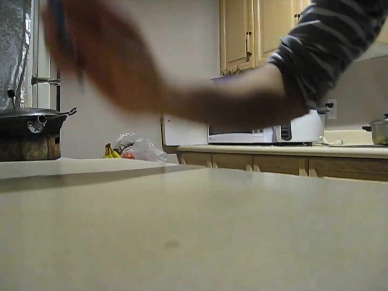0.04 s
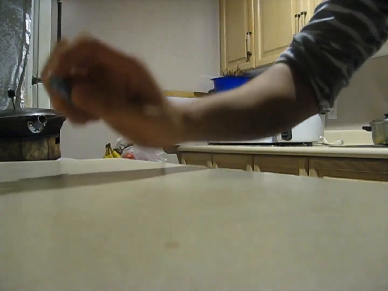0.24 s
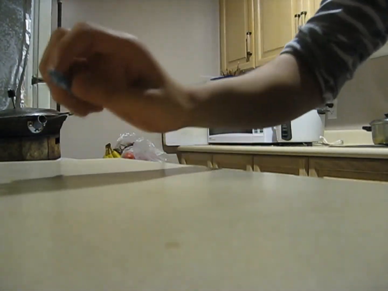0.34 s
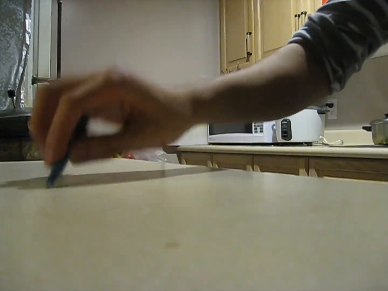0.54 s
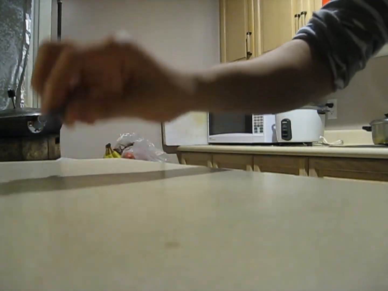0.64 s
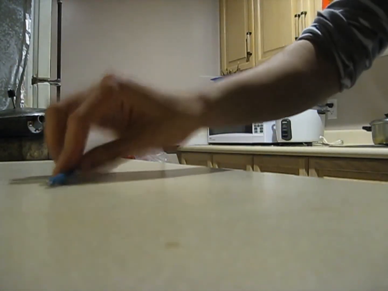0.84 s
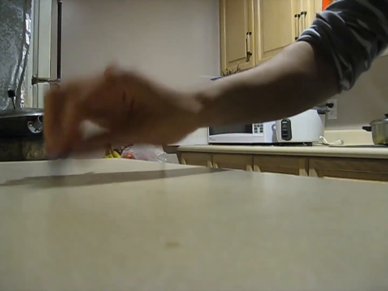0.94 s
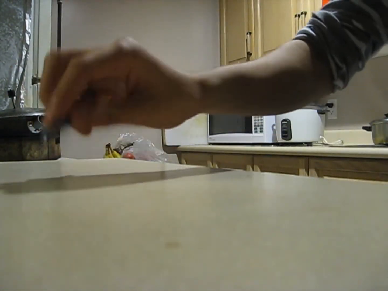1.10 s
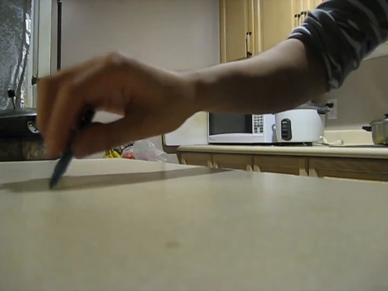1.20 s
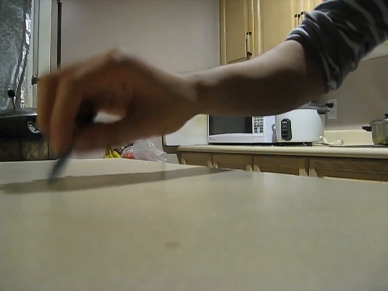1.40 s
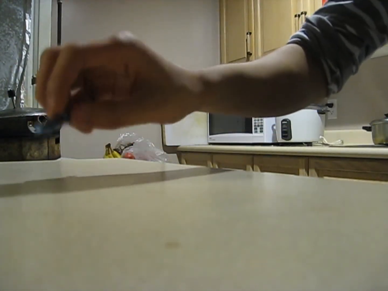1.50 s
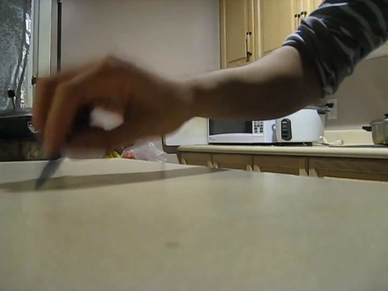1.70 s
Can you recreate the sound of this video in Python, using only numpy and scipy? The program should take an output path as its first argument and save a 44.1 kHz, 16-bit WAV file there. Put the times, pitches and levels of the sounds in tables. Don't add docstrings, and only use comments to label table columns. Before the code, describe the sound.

Hard pen taps on a countertop, one with a clattering slap, over faint appliance hum

```python
import sys
import numpy as np
from scipy import signal
from scipy.fft import rfft, irfft
from scipy.io import wavfile
from scipy.ndimage import uniform_filter1d

SR = 44100
rng = np.random.default_rng(int(sys.argv[2]) if len(sys.argv) > 2 else 0)


def output_pcm(signal):
    pcm = np.clip(np.atleast_2d(signal).T, -1, 1) * 32767
    wavfile.write(sys.argv[1], SR, np.round(pcm).astype(np.int16))


def gain_from_db(level_db):
    decades = np.asarray(level_db, float) / 20
    return 10 ** decades


N = 77175


def rms_one(x):
    return x / np.sqrt(np.mean(x ** 2) + 1e-20)


def at_hz(points, hz, column=1):
    points = np.array(points)
    return np.interp(np.log(hz), np.log(points[:, 0]), points[:, column])


def low_pass(x, hz, order=2):
    return signal.sosfilt(signal.butter(order, hz, fs=SR, output="sos"), x)


def high_pass(x, hz, order):
    return signal.sosfilt(signal.butter(order, hz, "high", fs=SR, output="sos"), x)


def band_pass(x, low_hz, high_hz, order):
    return signal.sosfilt(signal.butter(order, [low_hz, high_hz], "band", fs=SR, output="sos"), x)


def strike(modes, times_s, db, sign=1, alternate=-1):
    spread_db = 2
    at = (np.asarray(times_s) * SR).astype(int)
    spread = spread_db * rng.standard_normal((len(at), len(modes)))
    out = np.zeros(N)
    for k, (hz, level_db, t60) in enumerate(modes):
        clicks = np.full(N, 1e-18)
        np.add.at(clicks, at, sign * alternate ** k * gain_from_db(db + level_db + spread[:, k]))
        r = gain_from_db(-60 / (max(t60, .001) * SR))
        w = 2 * np.pi * hz / SR
        out += signal.lfilter([0, np.sin(w)], [1, -2 * r * np.cos(w), r * r], clicks)
    return out


def crack(spectrum, times_s, db, room_db):
    t60_s = 0.0084
    fade = gain_from_db(-60 * np.arange(512) / SR / t60_s)
    at = (np.asarray(times_s) * SR).astype(int)
    bursts = np.full((2, N + 512), 1e-18)
    noises = rng.standard_normal((len(at), len(fade)))
    for i, gain, noise in zip(at, gain_from_db(db), noises):
        bursts[0, i:i + len(fade)] += gain * noise * fade
    bursts[1, at] = 4 * gain_from_db(db + room_db)
    edges = 150 * 2 ** np.arange(0, 7.1, .5)
    out = 0
    for low, high in zip(edges, edges[1:]):
        gain = gain_from_db(at_hz(spectrum, np.sqrt(low * high)) + 12)
        out = out + gain * band_pass(bursts[:, :N], low, high, order=1)
    return out


def hum():
    # [f/Hz, level/dB per Hz]
    noise_colour = [(15, -35), (25, -15), (249, -9.5), (427, -13.5), (677, -6.5), (734, -21), (887, -6),
                    (1290, -15.5), (16000, -33.5)]
    # [f/Hz, width/Hz, level/dB]
    fridge_bands = [(47, 12, -66), (108, 120, -61.5), (702.3, 24, -52), (930, 89, -73), (1193, 69, -59),
                    (580, 44, -61), (8000, 250, -67)]
    broad_db = -36.5 - 8.0
    hz = np.maximum(np.fft.rfftfreq(N, 1 / SR), 1)
    broad = irfft(rfft(rng.standard_normal(N)) * gain_from_db(at_hz(noise_colour, hz)), N)
    out = gain_from_db(broad_db) * rms_one(broad)
    for centre_hz, width_hz, db in fridge_bands:
        resonance = 1 / (1 + (2 * (hz - centre_hz) / width_hz) ** 2)
        out = out + gain_from_db(db) * rms_one(irfft(rfft(rng.standard_normal(N)) * resonance, N))
    return out


def kitchen(x):
    # [f/Hz, level/dB, t60/s]
    room_bands = [(152, -0.5, 0.37), (387, -4.5, 0.29), (1080, -3, 0.33), (2100, -6.5, 0.33),
                  (4300, -12.5, 0.35), (8400, -15.5, 0.27), (15600, -3.5, 0.18)]
    start_s, build_s = 0.0013, 0.0065
    t = np.arange(SR) / SR
    edges = 60 * 2 ** np.arange(0, 8.3, .5)
    white = rng.standard_normal((2, SR))
    tail = 0
    for k, (low, high) in enumerate(zip(edges, edges[1:])):
        hz = np.sqrt(low * high)
        decay_db = at_hz(room_bands, hz) - 60 * t / at_hz(room_bands, hz, column=2)
        tail = tail + band_pass(white[k % 2], low, high, order=2) * gain_from_db(decay_db)
    tail = tail * np.clip((t - start_s) / build_s, 0, 1) / np.sqrt(SR / 40)
    return signal.fftconvolve(x, tail)[:N]


def hand():
    push_s = [
        .2038,
        .2072,
    ]
    push_db = [
        -0.5,
        0,
    ]
    knock_s = [
        .2049,
        .2190,
        .2472,
    ]
    knock_db = [
        0.61,
        -16.5,
        -14.5,
    ]
    # [f/Hz, level/dB, t60/s]
    board_modes = [(86, -9, .07), (113.8, -2, 0.087), (111.3, -20, 0.65), (148.1, -3, 0.2)]
    # [f/Hz, level/dB, t60/s]
    knock_modes = [(770, -26, .015), (1074, 0.5, 0.025), (1560, -3, 0.0064), (2113, 3.5, 0.0083),
                   (2900, -39, 0.0057), (5530, -35, 0.0069)]
    # [f/Hz, level/dB, t60/s]
    cupboard_modes = [(151, -4.5, 0.11), (220, -11, 0.082), (251.4, -11, 0.11), (290, -6, 0.085),
                      (347.3, -11, 0.11), (493, -7.5, 0.041), (650, -22, 0.072), (804, -14.5, 0.043),
                      (1060, -3.5, .03), (5320, -24, 0.065), (5450, -24, 0.035)]
    # [f/Hz, level/dB per Hz]
    hand_crack = [(200, -10.5), (600, 7), (1200, -11.5), (2200, -8.5), (4000, -11.5), (7000, 2),
                  (11000, -32), (16000, -38)]
    rattle_from_s, rattle_to_s, rattle_start_db, rattle_loss_db = .207, .27, -15, 10
    cupboard_db, room_db, skin_soft_hz = 0.5, 2, 3450
    damped_s, damp_s = 0.37, 0.0073

    share = np.sort(rng.random(24))
    rattle_s = rattle_from_s + share * (rattle_to_s - rattle_from_s)
    rattle_db = rattle_start_db - rattle_loss_db * share
    board = strike(board_modes, push_s, np.array(push_db), np.array([-1, 1]), alternate=0.63)
    board = board * np.exp(-np.maximum(np.arange(N) / SR - damped_s, 0) / damp_s)
    either_way = rng.choice([-1, 1], len(rattle_s))
    loose = strike(cupboard_modes, rattle_s, rattle_db + cupboard_db, either_way)
    knock = low_pass(strike(knock_modes, knock_s, np.array(knock_db)), skin_soft_hz)

    hit_s = np.r_[knock_s, rattle_s]
    hit_db = np.r_[knock_db, rattle_db]
    to_room_db = np.where(np.arange(len(hit_s)) == 0, room_db, -40)
    cracks = low_pass(crack(hand_crack, hit_s, hit_db, to_room_db), skin_soft_hz)
    return np.vstack([board + loose + knock, cracks])


def pen():
    # [strength/dB, brightness/dB, board/dB]
    tap_s = [
        .5737,
        .9252,
        1.2668,
        1.4472,
    ]
    tap_levels = [
        (0, 1, 1.5),
        (3.5, 1.5, 0),
        (-4.5, 0, -16),
        (-1, -0.5, 2.5),
    ]
    slap_s = [
        .9351,
        .9386,
        .9397,
        .9414,
        .9429,
        .9445,
        .9476,
    ]
    slap_levels = [
        -7.5,
        11,
        8.5,
        2.5,
        7,
        4.5,
        2,
    ]
    # [f/Hz, level/dB, t60/s]
    barrel_modes = [(498, -25.5, 0.089), (1050, -9.5, 0.034), (1193, -11, 0.023), (1816, -10.5, 0.037),
                    (2117, -4.5, 0.018), (2716, -1.5, 0.007), (3200, -13, 0.021)]
    # [f/Hz, level/dB, t60/s]
    refill_modes = [(4070, -8, 0.011), (4800, -17.5, 0.019), (5594, -8.5, 0.0081), (6320, 1, 0.0033),
                    (7470, -2, 0.0042), (10600, -42, 0.002), (12300, -50, 0.0067)]
    # [f/Hz, level/dB, t60/s]
    slap_modes = [(242, -6, 0.044), (728, -3.5, 0.027), (1100, 6.5, 0.0041), (1676, 5, 0.0065),
                  (2800, 6, 0.0048), (3640, -4, 0.003), (5800, -9, 0.0083), (11390, -16.5, 0.015)]
    # [f/Hz, level/dB, t60/s]
    under_pen_modes = [(106.7, -40, 0.4), (149.5, -40.5, 0.16), (231, -66, 0.15)]
    # [f/Hz, level/dB per Hz]
    tap_crack = [(200, -46), (600, -10), (1200, -18.5), (2200, -1), (4000, -17.5), (7000, 5.5),
                 (11000, -67), (16000, -11)]
    # [f/Hz, level/dB per Hz]
    slap_crack = [(200, -45), (600, -14), (1200, -3.5), (2200, 7), (4000, -2), (7000, -0.5), (11000, -36),
                  (16000, -7)]
    refill_lag_s, rebound_s, rebound_db = .00045, .0085, -19
    tip_soft_hz, low_cut_hz = 4540, 430
    slap_room_db, slap_on_board_db = 3, 4.5

    tap_s = np.array(tap_s)
    tap_db, bright_db, board_db = np.transpose(tap_levels)
    slap_db = np.array(slap_levels)
    click_db = tap_db + bright_db
    barrel = low_pass(strike(barrel_modes, tap_s, tap_db, alternate=0.94), tip_soft_hz)
    refill_s = np.r_[tap_s + refill_lag_s, tap_s + rebound_s]
    refill = strike(refill_modes, refill_s, np.r_[click_db, click_db + rebound_db])
    slap = strike(slap_modes, slap_s, slap_db)

    to_room_db = np.where(np.arange(len(slap_s)) == 1, slap_room_db, -40)
    cracks = crack(tap_crack, tap_s, click_db, 0) + crack(slap_crack, slap_s, slap_db, to_room_db)
    out = np.vstack([barrel + refill + slap, cracks])
    out[:2] = high_pass(out[:2], low_cut_hz, order=4)
    board_hit_db = np.r_[tap_db + board_db, slap_db[1] + slap_on_board_db]
    out[0] += strike(under_pen_modes, np.r_[tap_s, slap_s[1]], board_hit_db)
    return out


def scene():
    crack_close_db, ring_to_room_db, mic_low_cut_hz = -9.5, -15, 65
    ring, snap, click = pen() + hand()
    tail = kitchen(gain_from_db(ring_to_room_db) * ring + click)
    blows = ring + gain_from_db(crack_close_db) * snap + tail
    return (high_pass(blows, mic_low_cut_hz, order=3) + hum())[None]


def roll_off(x):
    return signal.sosfilt(signal.butter(12, 16940, fs=SR, output="sos"), x)


def record(dry):
    duck_from_db, duck_share, attack_s, recover_db_per_s = -3, 0.99, 0.0012, 142
    band_limit_hz, converter_hz = 15800 + 450, 16500
    rise = recover_db_per_s * np.arange(N) / SR
    level_db = 10 * np.log10(uniform_filter1d(dry ** 2, size=89, axis=1) + 1e-12)
    held_db = np.maximum.accumulate(level_db + rise, axis=1) - rise
    r = np.exp(-1 / (attack_s * SR))
    excess_db = np.maximum(held_db - duck_from_db, 0)
    cut_db = signal.lfilter([1 - r], [1, -r], duck_share * excess_db)
    band = signal.sosfilt(signal.cheby2(10, 50, band_limit_hz, fs=SR, output="sos"), dry)
    clipped = np.clip(band * gain_from_db(-cut_db), -1, 1)
    mix = np.clip(low_pass(clipped, converter_hz, order=6), -1, 1)
    return roll_off(mix)


dry = scene()
out = record(dry)
output_pcm(out)
```